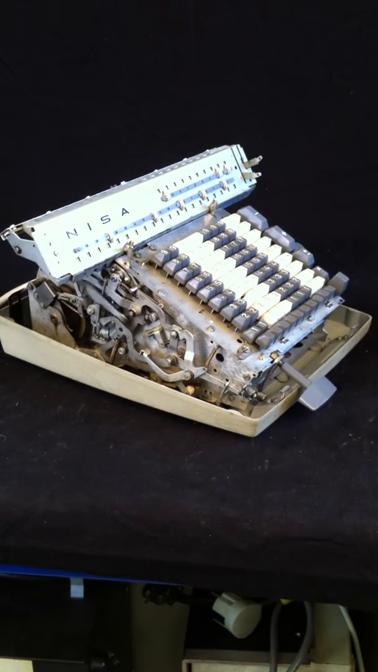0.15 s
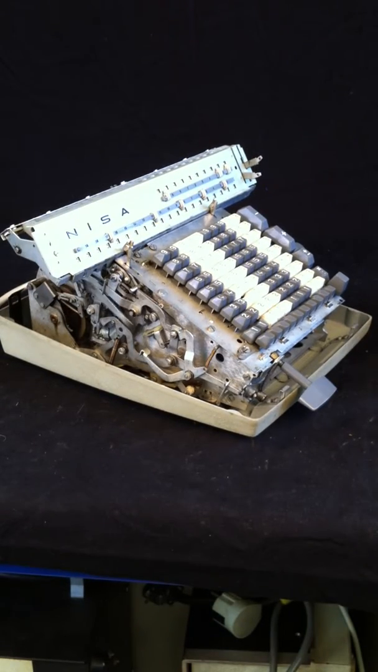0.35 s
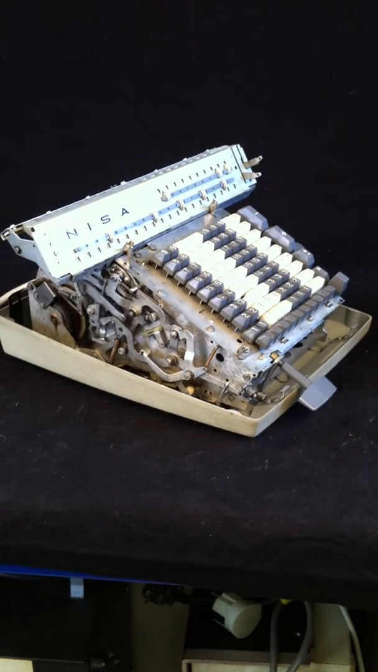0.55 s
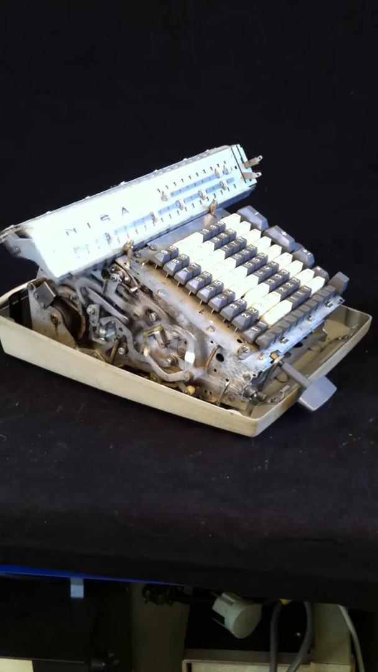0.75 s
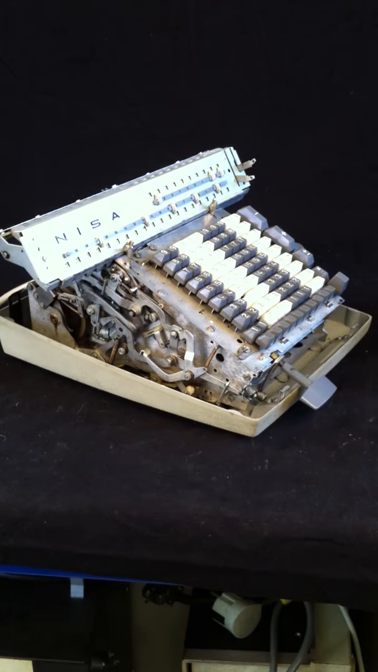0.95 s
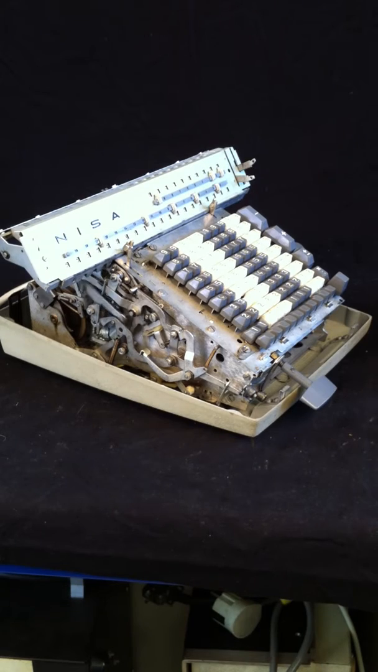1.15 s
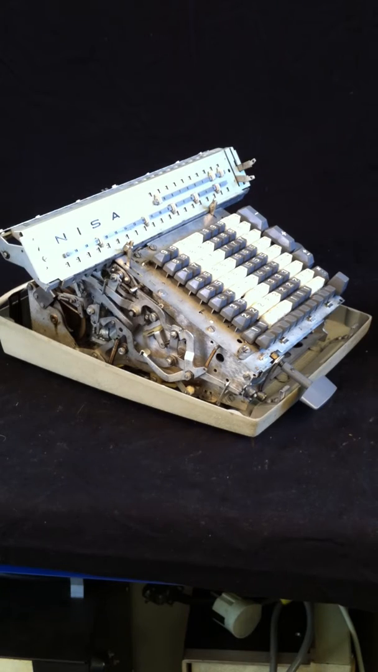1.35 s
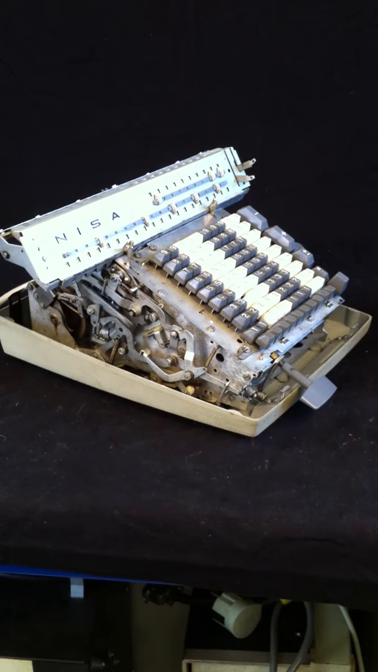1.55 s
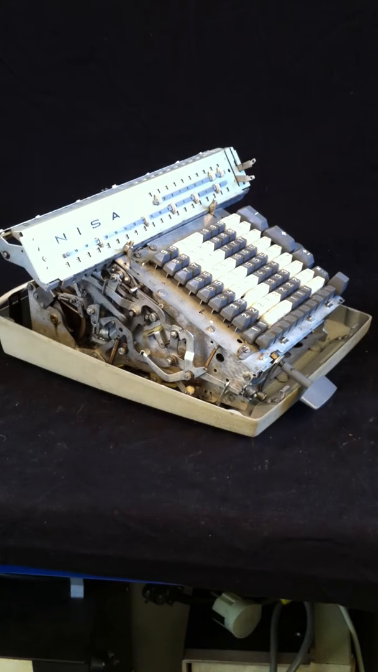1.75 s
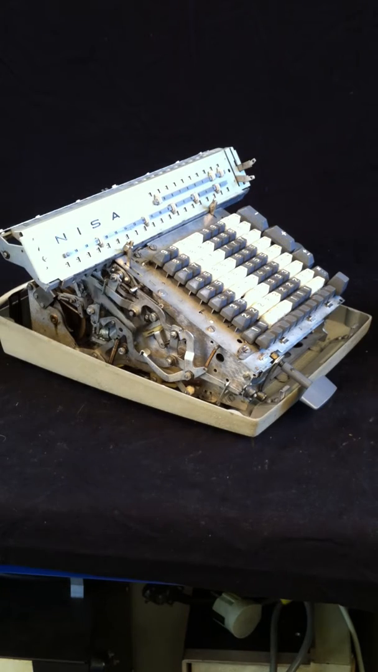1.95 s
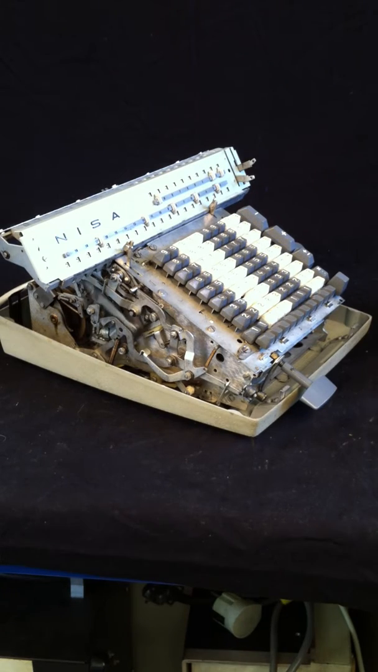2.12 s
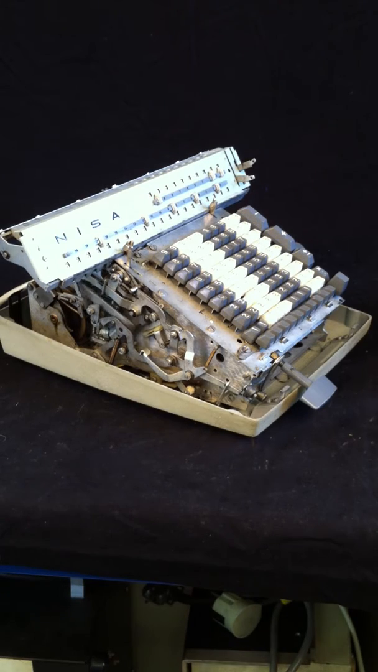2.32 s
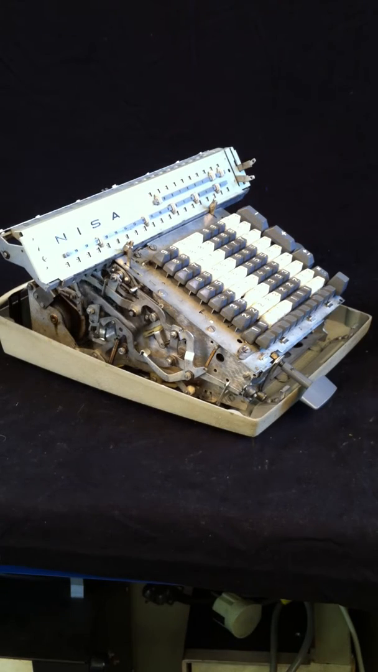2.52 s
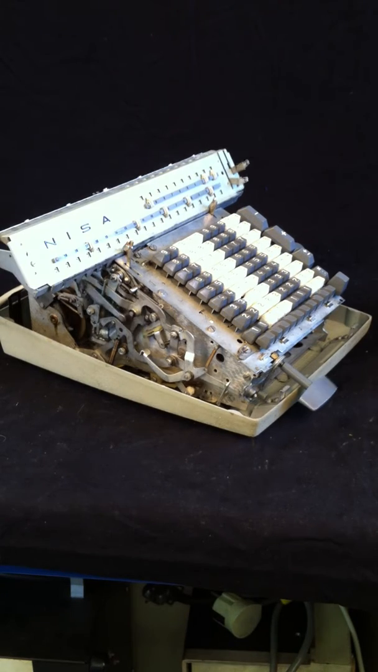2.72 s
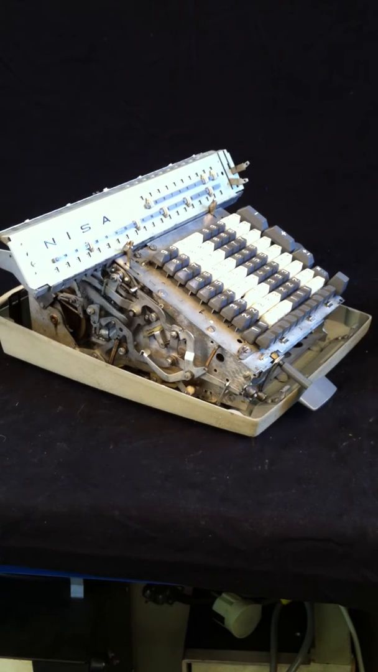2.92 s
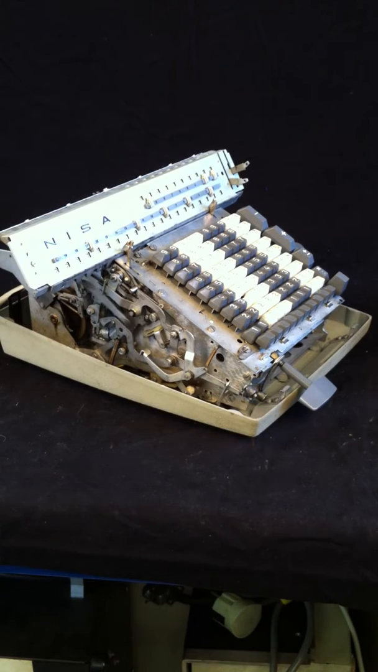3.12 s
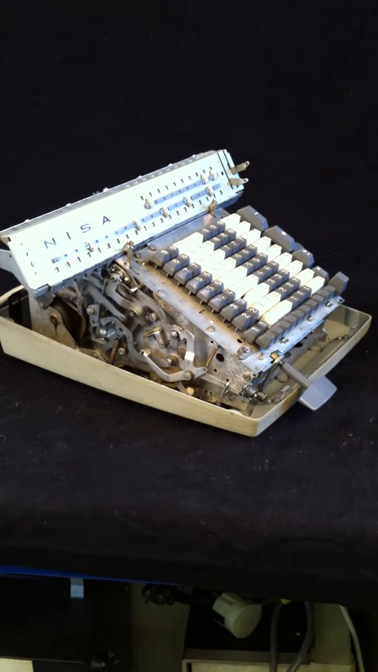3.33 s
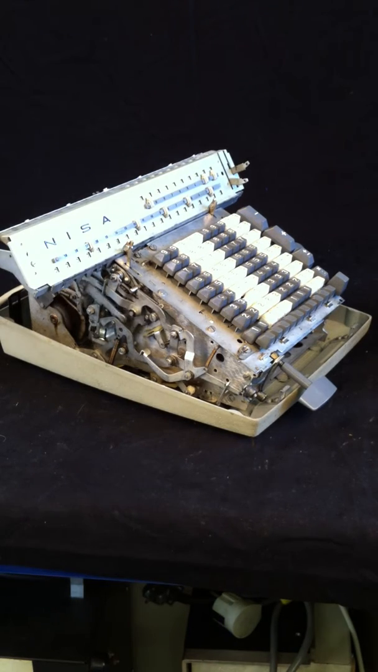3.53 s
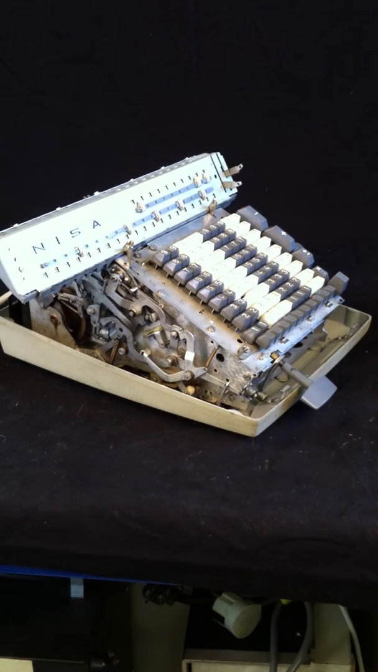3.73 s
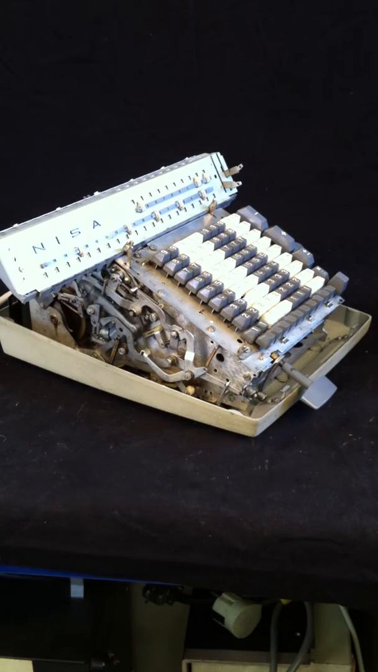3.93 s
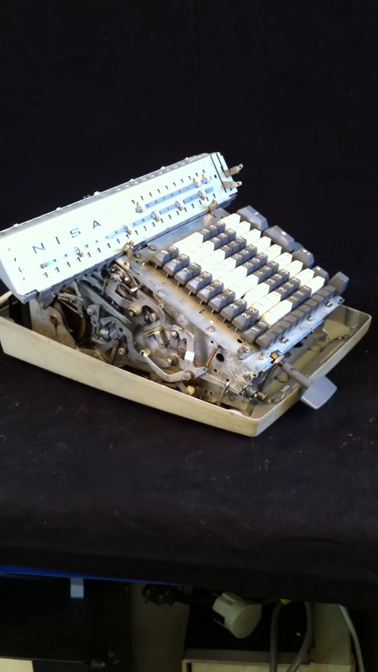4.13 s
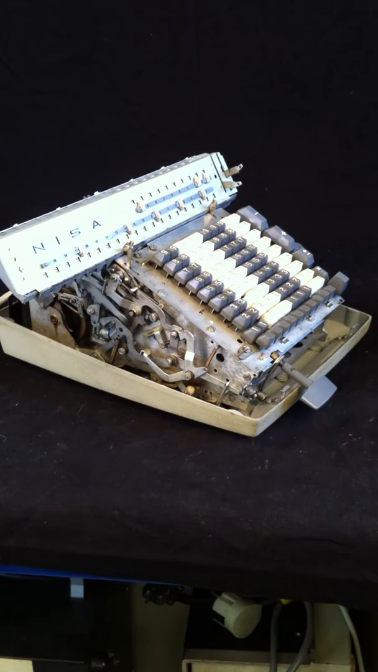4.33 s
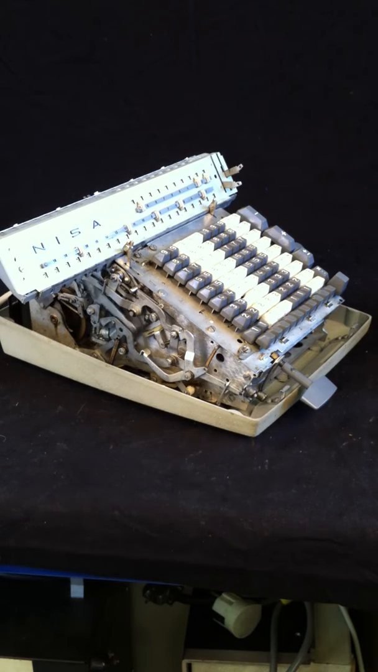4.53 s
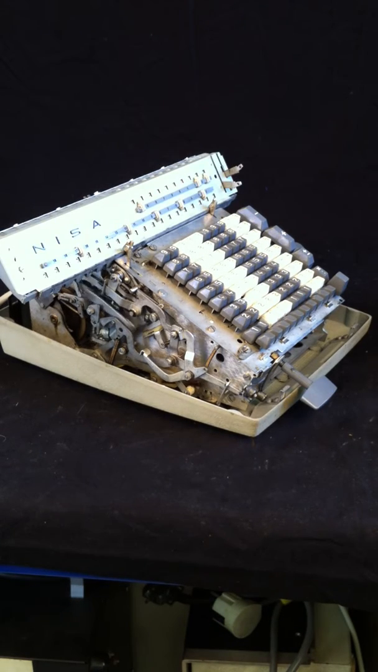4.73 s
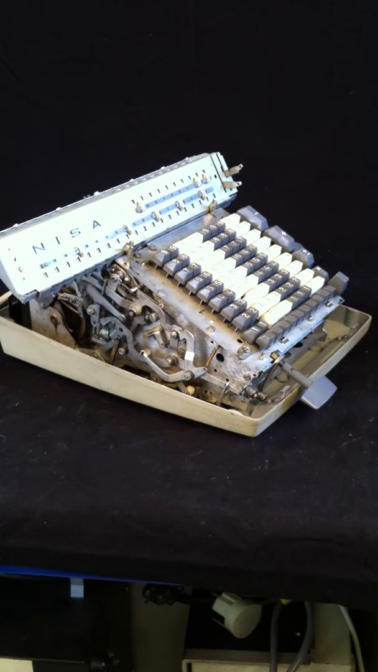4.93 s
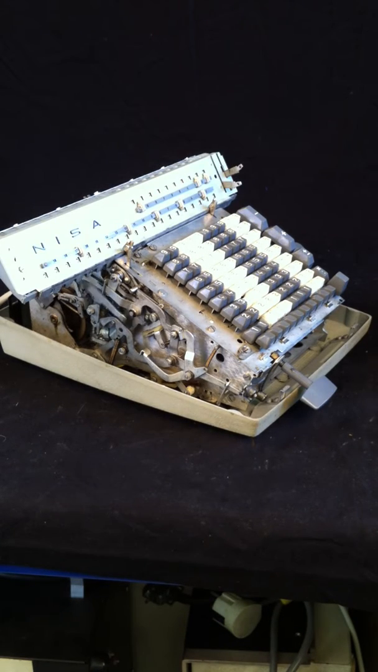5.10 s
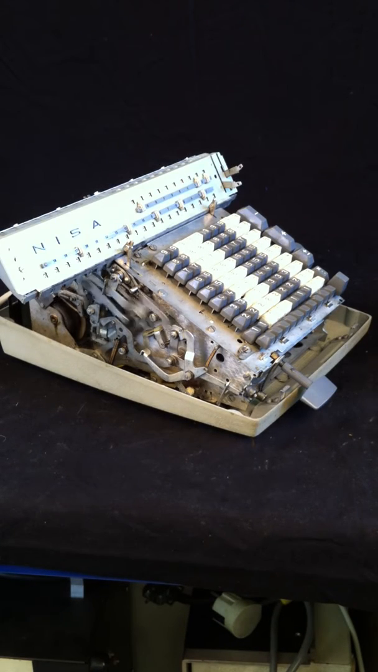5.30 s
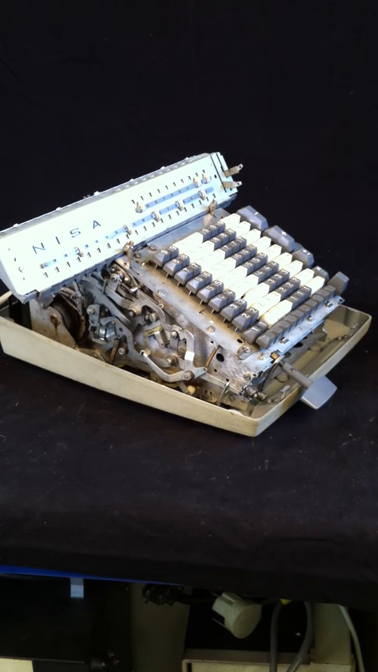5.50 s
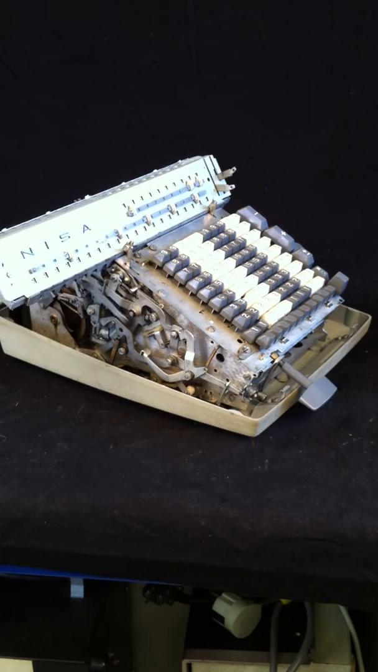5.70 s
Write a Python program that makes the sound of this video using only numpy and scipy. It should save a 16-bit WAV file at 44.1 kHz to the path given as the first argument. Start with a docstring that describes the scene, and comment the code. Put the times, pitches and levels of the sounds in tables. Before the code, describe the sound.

Bright steel ticking at six or seven a second, with chattering clutch, short scrapes and sharp clacks, as an old desk calculating machine works indoors.

```python
"""Pawls tick, about 6.5 times a second in steady runs, in a mechanical calculator, and a sprung lever rings.
The machine, its cover off, works through a long division on a table in a small room.
Now and then a clutch chatters, the carriage scrapes along its rack and knocks, and short hard snaps stand out.
Gears rattle and a motor hums underneath. Bursts of noise and tiny impacts, coloured by filters and
ringing modes, make the metal sounds; wavering sine waves make the hum."""
import sys
import numpy as np
from scipy import signal
from scipy.fft import rfft, irfft
from scipy.io import wavfile

SR = 44100
rng = np.random.default_rng(int(sys.argv[2]) if len(sys.argv) > 2 else 0)


def dump(signal):
    """Clip the signal to [-1, 1] and save it as 16-bit WAV at the path in sys.argv[1]."""
    limited = np.clip(np.atleast_2d(signal).T, -1, 1)
    pcm = np.round(limited * 32767).astype(np.int16)
    wavfile.write(sys.argv[1], SR, pcm)


N = 254016  # length in samples, 5.76 s

# Levels in the tables are relative: each layer gets its own gain later.
# runs of pawl and lever ticks, some mostly lever:
# start_s, first_pawl_db, second_pawl_db, lever_tick_db, lever_ring_db, ring_hz
TICK_RUNS = [(.0044, -20.5, -33, -31.5, -32, 2730), (.159, -20.5, -27.5, -31.5, -36, 2680),
             (.312, -20, -29, -33, -31.5, 2780), (0.4656, -19.5, -27.5, -30.5, -33, 2740),
             (.709, -35, -47, -29.5, -47, 3370), (1.0064, -22.5, -29, -31.5, -40, 2900),
             (1.1597, -21, -27.5, -30.5, -27.5, 2834), (1.3135, -20.5, -25, -31, -30.5, 3080),
             (1.4673, -20, -26.5, -33, -32, 2710), (1.6204, -20.5, -30, -32.5, -30.5, 2760),
             (1.774, -21, -26, -29.5, -34, 2970), (1.9278, -19.5, -26.5, -29.5, -40, 3080),
             (2.0822, -20.5, -30, -30.5, -29, 2710), (2.2354, -19.5, -29, -32.5, -31.5, 2690),
             (2.39, -21, -26, -30, -42, 2780), (2.529, -23, -41, -23, -39, 2850),
             (2.966, -30, -28, -29, -42, 3030), (3.124, -19.5, -27, -31, -31.5, 2910),
             (3.2784, -20, -29.5, -30.5, -33, 2990), (3.553, -39, -36, -28, -29, 3120),
             (3.874, -32, -29, -36, -35, 3080), (4.0275, -23.5, -37, -34, -36, 2746),
             (4.1822, -23, -32, -36, -38, 3110), (4.3364, -24, -29, -37.5, -37, 2630),
             (4.4925, -23, -33, -35.5, -33, 2614), (4.6457, -22.5, -30, -34, -33, 2700),
             (4.801, -22, -31, -31, -34, 2670), (4.9551, -20.5, -32, -31.5, -36, 3340),
             (5.1097, -21.5, -34, -32, -38, 3230), (5.2628, -22, -27.5, -32, -35, 3220),
             (5.404, -33, -36, -25, -43, 2640), (5.519, -34, -42, -34, -41, 3140)]
# clutch teeth chattering as they engage: start_s, level_db, length_s, spring_level_db
CLUTCH = [(0.266, -22.5, 0.0083, -32.5), (0.5775, -16, 0.014, -40), (0.831, -18, 0.011, -36),
          (1.118, -15, 0.0077, -28), (1.574, -20, 0.014, -34), (2.033, -23.5, 0.012, -35.5),
          (2.446, -22.5, 0.0089, -35.5), (2.5057, -16, 0.01, -60), (2.763, -13, 0.0052, -30),
          (3.075, -22, 0.012, -33.5), (3.388, -18, 0.014, -49), (3.675, -15.5, 0.0099, -28.5),
          (3.981, -26, 0.021, -38.5), (4.446, -21.5, 0.012, -37), (4.9084, -24, 0.011, -32),
          (5.382, -12.5, 0.0056, -33), (5.6608, -16.5, 0.0086, -32)]
# carriage scraping along its rack: start_s, level_db, length_s
SLIDES = [(0.609, -9, 0.029), (0.6565, -11.5, 0.02), (0.87, -10.5, 0.018), (2.535, -11.5, 0.017),
          (2.789, -10.5, 0.017), (3.4194, -12, 0.035), (3.704, -7, 0.024), (5.4085, -12.5, 0.021),
          (5.69, -8, 0.018)]
# carriage rolling free just before its stop: start_s, level_db, length_s
ROLLS = [(.875, -46.5, 0.064), (2.81, -47, 0.041), (3.728, -40, 0.037), (5.712, -40.5, 0.024)]
# carriage jolting and meeting its stop: start_s, steel_crack_db, frame_clank_db, case_thump_db, clank_hz
BLOWS = [(0.6887, -12.5, -37, -44.5, 1900), (0.8645, -12, -35, -37.5, 1010), (0.9246, -9, -25, -36, 1040),
         (0.9425, -3.5, -34, -36, 990), (2.5423, -10, -47, -42.5, 1330), (2.5502, -10, -49, -42, 1820),
         (2.634, -11.5, -41, -50, 2020), (2.8042, -7.5, -32, -35, 946), (2.8134, -16, -41, -46, 1140),
         (2.8468, -7, -24, -31.5, 1144), (2.8614, -7, -33, -39, 1080), (2.877, -8, -35, -49, 930),
         (2.935, -7.5, -36, -39.5, 1710), (3.4025, -15, -49, -56, 1080), (3.4315, -17, -50, -55, 1100),
         (3.4414, -9.5, -35, -59, 1500), (3.5295, -4.5, -23, -48, 1710), (3.5408, -10.5, -44, -58, 1870),
         (3.7705, -3.5, -21.5, -26, 1910), (3.7852, -4, -37, -46, 1490), (5.4179, -8.5, -36, -38.5, 1460),
         (5.5117, -4.5, -27.5, -48, 1750), (5.7481, -9, -24.5, -36, 1040),
         (5.7564, -11.5, -24.5, -37, 1030)]
# short hard snaps of light latches and stray pawls: start_s, level_db
SNAPS = [(0.62, -14), (0.627, -9), (0.841, -13), (0.9821, -4), (0.9904, -12), (1.4457, -25), (1.5845, -22),
         (1.8925, -15), (2.6237, -7), (2.6991, -15), (2.931, -4.5), (2.963, -6.5), (3.0823, -21),
         (3.245, -20), (3.4846, -11), (3.683, -13), (3.8402, -4.5), (3.8646, -18), (5.597, -17.5)]
# slow drift of the running works: time_s, gear_rattle_db, frame_grind_db
LOAD = [(0, -31, -52), (.46, -32.5, -52.5), (.78, -32, -54), (1.04, -29, -50.5), (1.3, -33.5, -53),
        (1.6, -30.5, -52.5), (1.75, -34, -54), (2.0, -31, -53), (2.45, -31.5, -52.5), (2.74, -32, -53),
        (3.0, -30.5, -51.5), (3.7, -32.5, -51.5), (4.13, -36, -57), (4.5, -34.5, -55), (5.2, -33.5, -53.5),
        (5.76, -33, -51.5)]
# moments when the main shaft rests before a carriage shift and the motor idles: time_s
IDLES = [.78, 2.71, 3.625, 5.625]
# hum of the motor at multiples of the mains: pitch_hz, level_db
HUM = [(100, -73.5), (200, -59), (300, -70)]
# how long the room rings, as the time to fall by 60 dB: pitch_hz, fall_s
ROOM = [(150, 0.7), (1000, 0.25), (5000, 0.43), (15000, 0.29)]

# dense ring of each part or sound, as a relative spectrum: pitch_hz, level_db (per Hz)
PAWL_COLOUR = [(240, -50), (400, -8.5), (1460, -19), (1990, -18), (3020, -1.5), (3310, -12), (6340, -6.5),
               (6850, -8), (8760, -18.5), (9610, -11), (11800, -0.5), (13500, 2), (16000, 0)]
THIN_PAWL_COLOUR = [(240, -38), (400, -10), (2000, -22), (3100, -14), (6500, -5), (10000, -1.5),
                    (12200, 0.5), (13700, 5), (16000, 0)]
LEVER_COLOUR = [(80, -64), (400, -16), (2000, -21), (2700, -7), (3600, -5), (4500, -4.5), (6200, -10.5),
                (8000, -2.5), (11000, -2), (13700, -3), (16000, -1.5)]
CLUTCH_COLOUR = [(80, -75), (400, -16.5), (2200, -31), (2900, -6), (3600, -11.5), (6000, -9.5), (9000, -11),
                 (11500, -23), (12500, 6.5), (14000, -1), (16000, -6)]
RACK_COLOUR = [(180, -52), (300, -11), (994, -11.5), (1230, -17), (1460, -16.5), (2400, -15), (2880, -17),
               (3700, -16), (5160, -13), (6960, -9.5), (10900, -8), (14000, -1.5), (16000, 1.5)]
STEEL_COLOUR = [(1180, -14), (2000, -20.5), (2380, -16), (2780, -9), (4610, -7.5), (6200, -6), (8400, -5.5),
                (9490, -10), (11500, -4.5), (13600, 5), (16000, 2.5)]
CLANK_COLOUR = [(100, -78), (400, -48), (800, -2.5), (1100, -3.5), (1350, -7), (1550, -4), (2000, -2),
                (2400, -13.5), (4000, -11)]
THUMP_COLOUR = [(30, -36), (100, -16.5), (200, 5.5), (330, -7.5), (450, -12.5), (650, 3), (850, -11.5),
                (1400, -26)]
GEAR_COLOUR = [(1180, -24), (2000, -12.5), (2670, -18.5), (2760, -3), (3040, -8), (3810, -1), (4730, -8),
               (6880, -3.5), (7190, -9), (8260, -4), (10200, -7), (15100, -2), (16000, 8.5)]
FRAME_COLOUR = [(210, -41), (350, -4.5), (400, -7), (532, 0.5), (679, -3.5), (1280, -5), (1610, 2),
                (1780, -3.5), (1940, -1.5), (2110, -7), (2390, -6), (2600, -4), (3380, -16), (5720, -120)]
CASE_COLOUR = [(15, -42), (25, -32), (64, -32.5), (134, 0), (165, 0.5), (188, -3), (200, 6), (233, -2),
               (288, 2), (313, -4.5), (344, -9), (369, -15), (420, -16.5), (550, -45), (920, -120)]
SIZZLE_COLOUR = [(500, -33.5), (3500, -10), (10500, -13.5), (12600, -5.5), (13800, 6.5), (14600, -7),
                 (16000, -7.5)]

# clearest ringing modes of each part: pitch_hz, smallest_width_hz (a wider one rings shorter), level_db
PAWL_MODES = [(4000, 59, -11), (5870, 61, -37), (6430, 36, 5), (7600, 74, 7), (7750, 190, -2),
              (8100, 33, -1), (8960, 52, 10), (9950, 28, -4), (10780, 100, 7), (12500, 45, -9),
              (14000, 160, 1.5), (15400, 54, -39)]
LEVER_MODES = [(2720, 56, -11), (3120, 450, 0.5), (6200, 270, 7), (13700, 560, 0)]
CLUTCH_MODES = [(11900, 450, 0), (12840, 370, -6)]
SPRING_MODES = [(2810, 30, -1.6), (2910, 210, -0.39)]
RACK_MODES = [(4140, 580, -5.5), (5330, 340, 0), (6130, 1100, 2.5)]
FRAME_MODES = [(1225, 15, 0), (1530, 93, 1), (1970, 84, -1.4)]
CASE_MODES = [(221, 54, -11), (278, 27, -2), (594, 110, -16), (668, 92, 3.5)]

# every row of TICK_RUNS places its ticks by the same lags after its start
BOUNCE_S, BOUNCE_DB = 0.0101, -11.5  # the first pawl hops once
SECOND_PAWL_S, LEVER_S = .041, .062
MESH_S, MESH_WIDTH_S, MESH_DB = 0.041, 0.021, 2  # gears rattle harder while driving the digit wheels
RUMBLE_DB = -.5  # case rumble against the frame grind
# each blow leaves the whole machine shuddering, in proportion to its thump
SHUDDER_S, SHUDDER_GRIND_DB, SHUDDER_RUMBLE_DB = 0.066, -13.5, -12
IDLE_WIDTH_S, IDLE_RUMBLE_DB, IDLE_HUM_DB, IDLE_SIZZLE_DB = 0.045, -4.5, -13, -15
EDGE_HZ = 15780  # upper edge of the whole sound


def pawls():
    """Dry, bright ticks: a heavy pawl drops and hops, then a thinner one follows."""
    s, first_db, second_db = np.transpose(TICK_RUNS)[:3]
    heavy = strikes(s, first_db, rise=.0004, decays=.0028, shake_db=-19, shake=.022)
    hop = strikes(s + BOUNCE_S, first_db + BOUNCE_DB, rise=0.00045, decays=0.0016, shake_db=-20, shake=.015)
    thin = strikes(s + SECOND_PAWL_S, second_db, rise=0.00073, decays=0.0082, shake_db=-23, shake=.014)
    heavy_tick = part(heavy, PAWL_COLOUR, PAWL_MODES, ring_db=-8.5)
    light_ticks = coloured(hop + thin, THIN_PAWL_COLOUR)
    return amp(-3.0) * heavy_tick + amp(-1.0) * light_ticks


def lever():
    """Last in each run of ticks the sprung lever returns: a softer tick that rings near 3 kHz."""
    start_s, _, _, tick_db, ring_db, ring_hz = np.transpose(TICK_RUNS)
    s = start_s + LEVER_S
    force = strikes(s, tick_db, rise=0.00098, decays=0.0068, shake_db=-32, shake=.015)
    tick = part(force, LEVER_COLOUR, LEVER_MODES, ring_db=-6.5)
    ring = pings(s, ring_db, ring_hz, decay=0.0055, spread=0.046)
    return amp(-1) * tick + amp(-2.5) * ring


def clutch():
    """Engaging teeth make a short, zinging chatter that sets a spring ringing."""
    s, db, length, spring_db = np.transpose(CLUTCH)
    teeth = rubs(zip(s, db, length), rise=.004, release=.005, per_s=2600, spread_db=2.5)
    spring = rubs(zip(s, spring_db, length), rise=.004, release=.004, per_s=5000, spread_db=1)
    chatter = part(teeth, CLUTCH_COLOUR, CLUTCH_MODES, ring_db=-9.0)
    return amp(-6) * chatter + amp(-4) * rung(spring, SPRING_MODES)


def carriage():
    """It scrapes and rolls; each blow cracks in the steel, clanks in the frame and thumps in the case."""
    s, crack_db, clank_db, thump_db, clank_hz = np.transpose(BLOWS)
    scrape = rubs(SLIDES, rise=.007, release=0.007, per_s=4500, spread_db=2.0)
    slide = part(scrape, RACK_COLOUR, RACK_MODES, ring_db=-14.0)
    steel_hit = strikes(s, crack_db, rise=0.00081, decays=0.0017, shake_db=-10.5, shake=0.015)
    crack = coloured(steel_hit, STEEL_COLOUR)
    frame_hit = strikes(s, clank_db, rise=.0002, decays=.0028, shake_db=-13.5, shake=0.027)
    clank = part(frame_hit, CLANK_COLOUR, FRAME_MODES, ring_db=-6.5)
    ping = pings(s, clank_db, clank_hz, decay=0.0049, spread=0.069)
    case_hit = strikes(s, thump_db, rise=0.00071, decays=0.0035, shake_db=-12, shake=0.047)
    roll = rubs(ROLLS, rise=0.0024, release=0.019, per_s=1800, spread_db=5.5)
    thump = part(case_hit + roll, THUMP_COLOUR, CASE_MODES, ring_db=-4.0)
    high = amp(-11.5) * slide + amp(-7.5) * crack
    low = amp(-5.0) * clank + amp(-2.5) * ping + amp(-2.5) * thump
    return high + low


def snaps():
    """Light latches and stray pawls snap hard in steel, mostly over in a couple of milliseconds."""
    force = strikes(*np.transpose(SNAPS), rise=.0008, decays=.0011, shake_db=-25, shake=.016)
    return amp(-6) * coloured(force, STEEL_COLOUR)


def gear_train():
    """Backlash (slack) in the gears rattles without pause, grinds in the frame and rumbles in the case."""
    s, *columns = np.transpose(LOAD)
    rattle_db, grind_db = (np.interp(np.arange(N) / SR, s, c) for c in columns)
    mesh, shaken = meshing(), np.sqrt(shudder())
    # teeth take up their slack at uneven moments, each contact a tiny tick
    contacts_per_s = 115 * np.exp(.5 * wander(rate_hz=60))
    contact = np.diff(np.floor(np.cumsum(contacts_per_s) / SR), prepend=0)
    hardness = amp(2.2 * np.clip(rng.standard_normal(N), -2, 1.5))
    # each contact's power dies away with a time constant of 1.7 ms
    ticking = signal.lfilter([1], [1, -np.exp(-1 / (.0017 * SR))], contact * hardness ** 2)
    ticks = evened(np.sqrt(ticking) * rng.standard_normal(N))
    teeth = ticks + .6 * grains(per_s=9000, spread_db=2)
    rattle = coloured(teeth * amp(rattle_db + MESH_DB * mesh), GEAR_COLOUR)
    # hypot adds the powers of the steady running and the shudder
    steady_grind = amp(grind_db + 1.4 * mesh + 1.8 * wander(rate_hz=37))
    grinding = np.hypot(steady_grind, amp(SHUDDER_GRIND_DB) * shaken)
    steady_rumble = amp(grind_db + RUMBLE_DB + 0.81 * wander(rate_hz=11))
    rumbling = np.hypot(steady_rumble, amp(SHUDDER_RUMBLE_DB) * shaken)
    rumbling = rumbling * amp(IDLE_RUMBLE_DB * swells(IDLES, IDLE_WIDTH_S))
    grind = coloured(grains(per_s=2500, spread_db=2.0) * grinding, FRAME_COLOUR)
    rumble = coloured(rng.standard_normal(N) * rumbling, CASE_COLOUR)
    return amp(-2.0) * rattle + amp(-1.5) * grind + amp(-1.5) * rumble


def meshing():
    """Swells once in each run of ticks, while the digit wheels are driven."""
    return swells(np.transpose(TICK_RUNS)[0] + MESH_S, MESH_WIDTH_S)


def shudder():
    """Power that the blows leave in the machine, dying away."""
    kicks = np.zeros(N)
    for s, _, _, thump_db, _ in BLOWS:
        add(kicks, s, [amp(thump_db) ** 2])
    return signal.lfilter([1], [1, -np.exp(-2 / (SHUDDER_S * SR))], kicks)


def motor():
    """Wavering mains hum under a fine sizzle; both follow the load and sink when the motor idles."""
    t = np.arange(N) / SR
    s, rattle_db, grind_db = np.transpose(LOAD)
    idle = swells(IDLES, IDLE_WIDTH_S)
    hum = np.zeros(N)
    for hz, db in HUM:
        level = amp(db + 3.5 * np.clip(wander(rate_hz=9), -2, 1))
        slip = .4 * wander(rate_hz=11.0)  # unsteady phase, in radians
        hum += level * np.sqrt(2) * np.sin(2 * np.pi * hz * t + slip)
    hum_db = np.interp(t, s, grind_db - grind_db.mean()) + IDLE_HUM_DB * idle
    sizzle_db = np.interp(t, s, rattle_db) - 9.5 + 4.7 * meshing() + IDLE_SIZZLE_DB * idle
    sizzle = coloured(grains(per_s=12000, spread_db=3.5), SIZZLE_COLOUR)
    return amp(hum_db) * hum + amp(sizzle_db) * sizzle


def room(x):
    """Sparse reflections of random sign, each band dying at its own speed."""
    taps = np.zeros(SR // 2)
    at = np.arange(SR // 200, len(taps) - 20, 20)  # the first comes after 5 ms
    taps[at + rng.integers(0, 20, len(at))] = rng.choice([-1., 1.], len(at))
    hz, t, bands = signal.stft(taps, SR, nperseg=256)
    fading = amp(-60 * t / read(ROOM, hz)[:, None])
    tail = signal.istft(bands * fading, SR)[1]
    return signal.oaconvolve(x, tail / np.linalg.norm(tail))[:N]


def strikes(times, levels_db, rise, decays, shake_db, shake):
    """Each blow is a fast noise crack, then loose neighbouring parts shake for a moment (times in s)."""
    t, power = np.arange(SR // 4) / SR, np.zeros(N)
    for s, db, decay in np.broadcast(times, levels_db, decays):
        fall = np.exp(-t / decay) + amp(shake_db) * np.exp(-t / shake)
        shape = (1 - np.exp(-t / rise)) * fall
        add(power, s, (amp(db) * shape / shape.max()) ** 2)
    return np.sqrt(power) * rng.standard_normal(N)


def rubs(rows, rise, release, per_s, spread_db):
    """Surfaces skip over each other for a short while: a swell of tiny impacts (times in s)."""
    t, swell = np.arange(SR // 4) / SR, np.zeros(N)
    for s, db, length in rows:
        fall = np.exp(-np.maximum(t - length, 0) / release)
        add(swell, s, amp(db) * (1 - np.exp(-t / rise)) * fall)
    return swell * grains(per_s, spread_db)


def grains(per_s, spread_db):
    """Tiny impacts at random moments, a few much harder than the rest, scaled to rms 1."""
    size = amp(spread_db * np.minimum(rng.exponential(1, N), 4))
    sign = rng.choice([-1., 1.], N)
    return evened(size * sign * (rng.random(N) < per_s / SR))


def pings(times, levels_db, pitches_hz, decay, spread):
    """A struck part sings as a cluster of seven close modes around the given pitch."""
    t, out = np.arange(SR // 8) / SR, np.zeros(N)
    shape = (1 - np.exp(-t / 0.002)) * np.exp(-t / decay)
    for s, db, hz in zip(times, levels_db, pitches_hz):
        cluster = hz * (1 + spread * np.linspace(-1, 1, 7))
        cycles = cluster[:, None] * t + rng.random((len(cluster), 1))  # random starting phases
        ring = np.sin(2 * np.pi * cycles).sum(0) * shape
        add(out, s, amp(db) * ring * np.linalg.norm(shape) / np.linalg.norm(ring))
    return out


def part(force, colour, modes, ring_db):
    """A metal part answers a force with a dense ring and a few clear modes."""
    return coloured(force, colour) + amp(ring_db) * rung(force, modes)


def coloured(x, colour):
    """Filters with the given spectrum, at unit energy, so that each push sounds only after it happens."""
    hz = abs(np.fft.fftfreq(4096, 1 / SR))
    log_gain = np.log(amp(np.maximum(read(colour, hz), -100)))
    # minimum phase: the answer comes as early as this spectrum allows
    taps = np.fft.ifft(np.exp(np.conj(signal.hilbert(log_gain)))).real[:2048]
    return signal.oaconvolve(x, taps / np.linalg.norm(taps))[:N]


def rung(x, modes):
    """Rings a set of damped modes, of unit energy together; oiled joints keep every ring short."""
    t = np.arange(SR // 4) / SR
    hz, width, db = np.transpose(modes)[:, :, None]
    width = np.maximum(width, .022 * hz)
    fading = np.exp(-np.pi * width * t)
    taps = (amp(db) * width * fading * np.cos(2 * np.pi * hz * t)).sum(0)
    return signal.oaconvolve(x, taps / np.linalg.norm(taps))[:N]


def swells(times, width_s):
    """A smooth bump of height 1 around each moment; bumps that overlap add up."""
    t = np.arange(N) / SR
    return sum(np.exp(-((t - s) / width_s) ** 2) for s in times)


def wander(rate_hz):
    """Slow random drift of rms 1: noise with its changes faster than rate_hz weakened."""
    hz = np.fft.rfftfreq(N, 1 / SR)
    slow = rfft(rng.standard_normal(N)) / (1 + (hz / rate_hz) ** 4)
    return evened(irfft(slow, N))


def read(points, hz):
    """Reads a table of values between its points, on a log-frequency axis."""
    f, value = np.transpose(points)
    return np.interp(np.log(hz + 1), np.log(f + 1), value)


def amp(db):
    """Decibels to gain."""
    return 10 ** (np.asarray(db) / 20)


def evened(x):
    """Scales to rms 1."""
    return x / np.sqrt(np.mean(x ** 2) + 1e-20)


def add(mix, s, sound):
    """Adds a sound into the mix at time s, in seconds."""
    place = mix[max(round(s * SR), 0):][:len(sound)]  # a view, so the mix itself changes
    place += sound[:len(place)]


def scene():
    """The machine close by, the room behind it."""
    works = pawls() + snaps() + lever() + clutch() + carriage() + gear_train()
    heard = works + amp(-11.0) * room(works) + motor()
    scatter = rng.standard_normal(SR // 250)  # a cluttered wall smears its echo over 4 ms
    echo = signal.oaconvolve(works, scatter / np.linalg.norm(scatter))
    add(heard, .0105, amp(-12.0) * echo)
    return heard[None]


def record(dry):
    """Cuts off the treble steeply around EDGE_HZ."""
    low_pass = signal.firwin(401, EDGE_HZ, window=("kaiser", 7), fs=SR)
    return signal.oaconvolve(dry, low_pass[None], "same")


dry = scene()
out = record(dry)
dump(out)
```